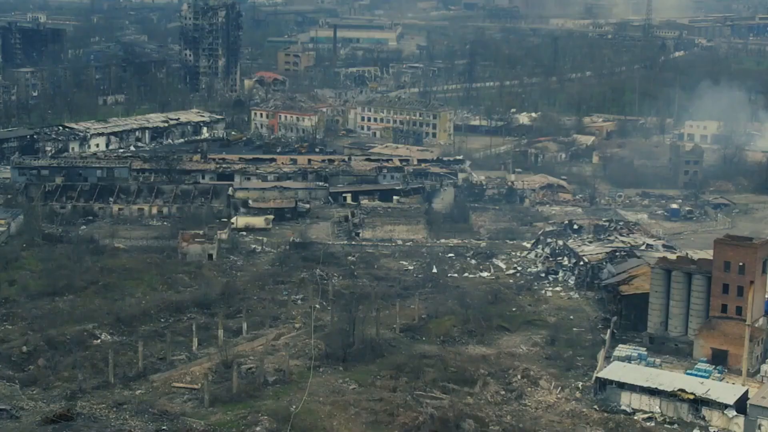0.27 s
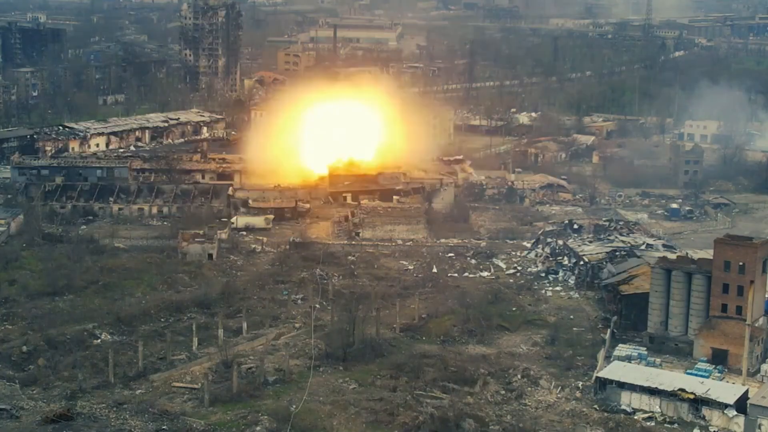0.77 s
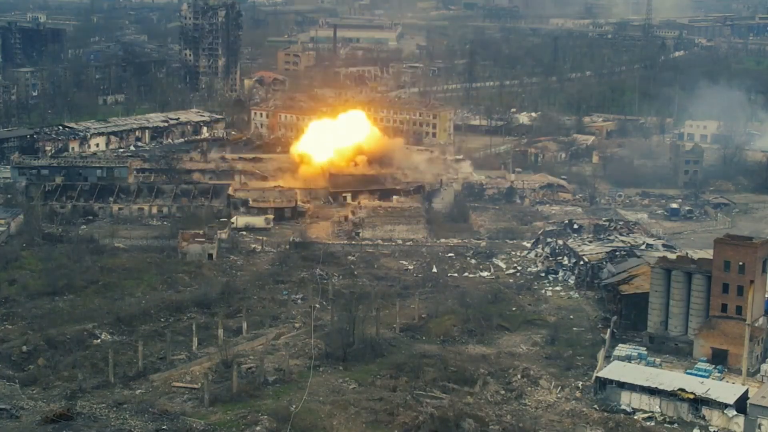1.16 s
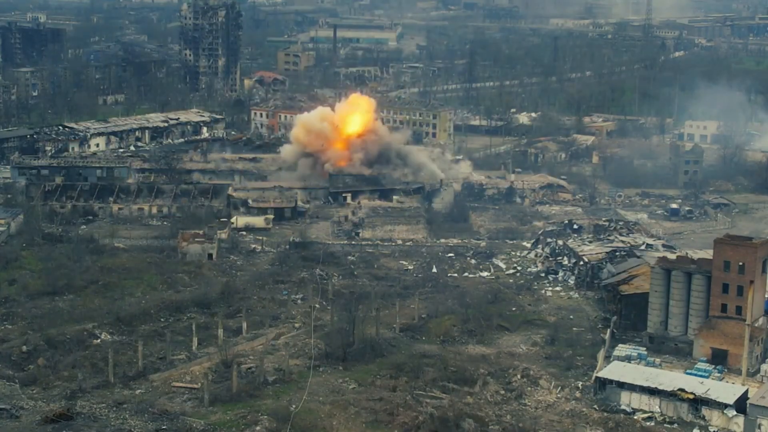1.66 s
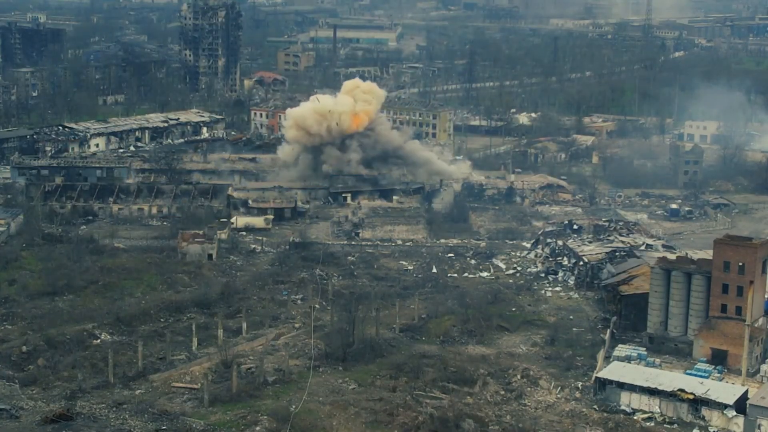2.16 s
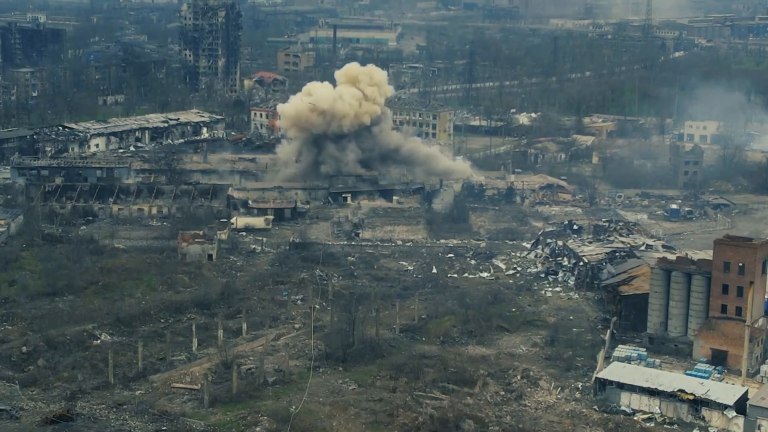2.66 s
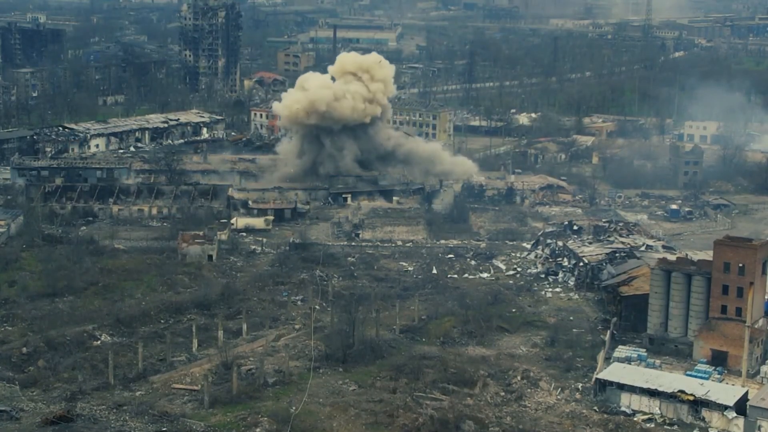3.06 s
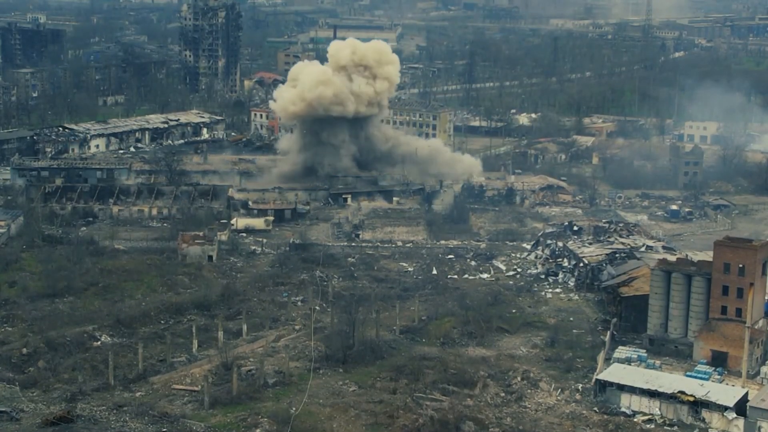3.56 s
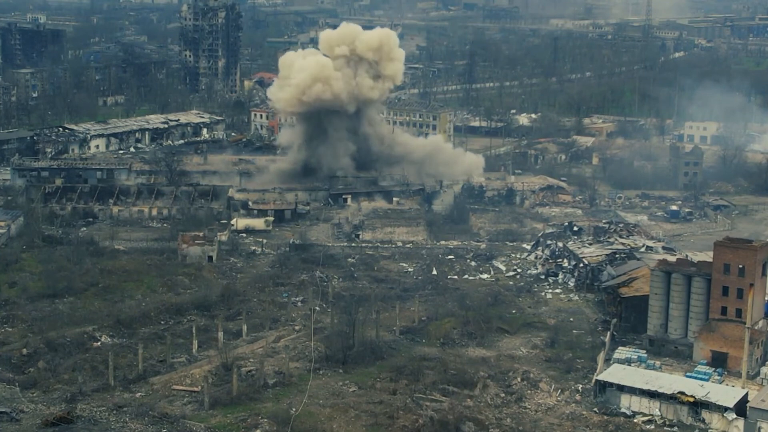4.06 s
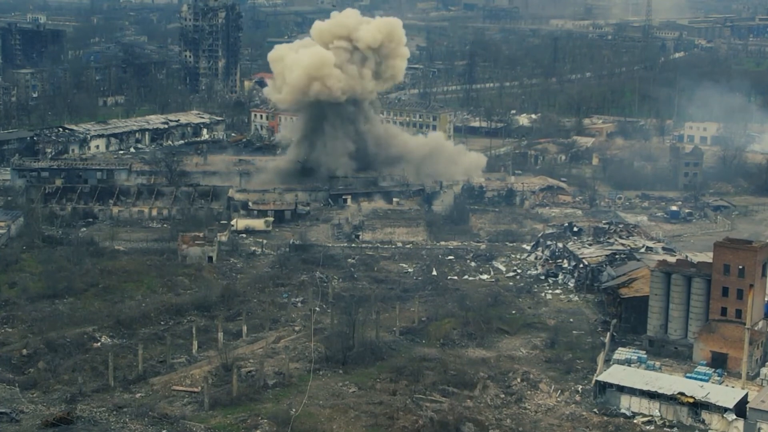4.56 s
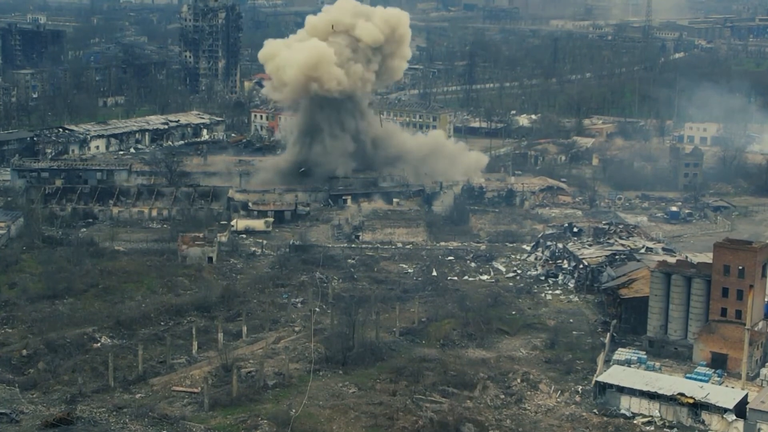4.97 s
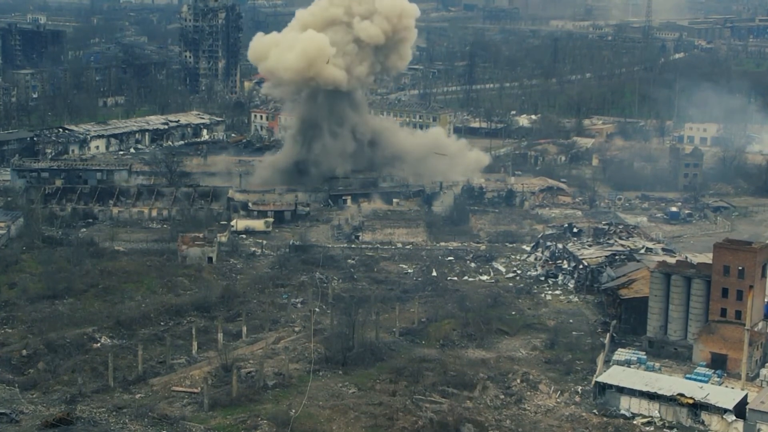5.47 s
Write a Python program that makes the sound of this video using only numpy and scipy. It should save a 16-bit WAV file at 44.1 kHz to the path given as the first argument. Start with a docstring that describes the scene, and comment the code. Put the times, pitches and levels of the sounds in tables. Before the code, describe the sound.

Outdoors over wide ruins, a low wavering hum with brief dropouts sits in rushing air for under a second. A huge blast cuts it off, flattening the microphone's peaks: dense cracks, booms and crackling roar. Further sharp shocks follow, the roar dulls and swells again, fragments tick and snap, far echoes thud, and the hum returns in short snatches over a deep rumble.

```python
"""Explosion among ruins

A wavering hum and rushing air, then a large blast outdoors that overloads the microphone and stops the hum.
Hum is beating tones, air and roar are coloured noise; the roar swells in waves, dulls and turns to deep rumble.
Shocks are single-cycle cracks with falling booms, debris is clusters of brief high modes with puffs of grit.
Lumps of echo and soft thuds roll in from afar, and the hum comes back in short stretches."""
import sys
import numpy as np
from scipy import signal
from scipy.fft import rfft, irfft
from scipy.io import wavfile
from scipy.ndimage import uniform_filter1d

SR = 44100
rng = np.random.default_rng(int(sys.argv[2]) if len(sys.argv) > 2 else 0)


def store_wav(level_fs):
    """Save 16-bit WAV to argv[1]."""
    pcm = np.round(np.clip(np.atleast_2d(level_fs), -1, 1) * 32767)
    wavfile.write(sys.argv[1], SR, pcm.T.astype(np.int16))


N = 252252
T = np.arange(N) / SR  # s

# Colours of noise. Each row: frequency in Hz, relative density in dB per Hz.
AIR_COLOUR = [(18, -1.5), (40, 0.5), (65, -7), (100, -2), (170, -2), (240, -7.5), (450, -7), (900, -11.5),
              (1800, -23), (3500, -45), (8000, -50.5), (15000, -65.5)]
ROAR_COLOUR = [(15, -14), (35, 0.5), (70, -3.5), (150, -1.5), (280, -8), (450, -11.5), (1000, -17.5),
               (2300, -31), (4000, -49), (7300, -52.5), (9000, -64), (15000, -78.5)]
RUMBLE_COLOUR = [(15, -0.5), (70, 6.5), (160, -1), (240, -6.5), (330, -11), (550, -18), (1000, -31.5),
                 (2000, -37.5), (3200, -51.5), (4500, -46.5), (7300, -63.5), (9800, -61), (15000, -83)]
SCATTER_COLOUR = [(30, 8), (150, 9.5), (400, -1.5), (900, -7.5), (2500, -24), (4500, -32.5), (8000, -41),
                  (15000, -68.5)]
GRIT_COLOUR = [(1500, -34.5), (3500, -2.5), (5200, -6), (7400, -3), (9000, -16), (12000, -25.5),
               (16000, -31.5)]
THUD_COLOUR = [(25, -7.5), (60, 4), (200, 0), (450, -4.5), (800, -12.5), (1600, -28), (4000, -50),
               (12000, -76)]
# Likeness of left and right in the open. Each row: frequency in Hz, correlation from -1 to 1.
LIKENESS = [(60, 1), (180, 0.95), (330, 0.9), (520, 0.6), (950, -0.21), (1700, 0.16), (3500, 0.35),
            (6000, -0.097)]
# Balance of the wide roar. Each row: frequency in Hz, left minus right in dB.
LEAN = [(50, -3.5), (200, -3.5), (330, -6), (520, -6), (750, -5), (1150, -1.5), (2600, -0.4), (7000, -4)]

# Faint rings above the hum. Each row: pitch in Hz, width in Hz, relative level in dB.
HUM_RINGS = [(418, 35, -15), (705, 20, -24), (812, 27, -31), (1015, 20, -26.5), (1092, 18, -35.5),
             (1300, 43, -33.5)]
# Brief dips of the hum. Each row: centre in seconds, depth in dB, half length in seconds.
HUM_DIPS = [(0.025, 18.5, 0.0099), (0.061, 14, 0.012), (0.187, 14.5, 0.038), (0.285, 10, 0.009),
            (0.393, 22, 0.0047), (0.426, 6, 0.012), (0.475, 25, 0.007), (0.591, 21, 0.007),
            (0.639, 12, 0.02)]
# Stretches of returning hum. Each row: start in seconds, length in seconds, relative level in dB, pitch in Hz.
HUM_RETURNS = [(3.443, 0.046, -12, 274.8), (3.717, 0.048, -17, 274), (4.123, 0.04, -13.5, 278.7),
               (4.24, 0.073, -14, 271.4), (4.466, 0.098, -13, 271.7), (4.661, 0.1, -12, 272.5),
               (4.839, 0.061, -13, 269.8), (4.887, 0.11, -12.5, 270.4), (5.068, 0.063, -13, 282.8),
               (5.121, 0.06, -12.5, 289.8), (5.284, 0.104, -10.5, 271.8), (5.469, 0.142, -10.5, 274.3)]

# Gusts in the rushing air. Each row: peak in seconds, relative level in dB, rise in seconds, fall in seconds.
GUSTS = [(.12, -44, 0.027, 0.024), (.325, -31, 0.019, 0.014), (.468, -24.5, 0.018, 0.029),
         (.7, -33.5, .015, 0.015)]

# Dull far echoes. Each row: start in seconds, relative level in dB.
THUDS = [(2.7, -10.5), (4.1, -20.5), (4.625, -15), (5.642, -7.5)]
# Lumps of echo. Each row: peak in seconds, level in dB, half length in seconds, centre in Hz.
ROLLS = [(0.798, -10, 0.013, 624), (.803, -5.5, 0.011, 151), (1.0, -14.5, .025, 410),
         (1.102, -13.5, 0.05, 179), (1.13, -25, 0.053, 1100), (1.215, -12, 0.054, 165),
         (1.25, -16.5, 0.018, 277), (1.344, -25, 0.047, 500), (1.35, -10, 0.06, 59.7),
         (1.562, -10.5, 0.027, 65), (1.662, -11.5, 0.023, 312), (2.144, -17, 0.051, 383),
         (2.188, -14.5, 0.021, 290), (2.297, -19, 0.039, 80.5), (2.337, -26, 0.027, 410),
         (2.56, -10.5, 0.0074, 194), (2.712, -12.5, 0.024, 141), (2.953, -10, 0.038, 167),
         (3.098, -14, 0.0065, 168), (3.106, -21, 0.021, 700), (3.464, -23.5, 0.033, 800),
         (3.513, -24.5, 0.066, 286), (3.71, -14, 0.027, 153), (4.08, -17.5, 0.029, 150),
         (4.147, -10, 0.025, 55), (4.287, -20, .07, 390), (4.55, -36, 0.063, 2100),
         (4.597, -20, 0.049, 520), (4.664, -13, 0.05, 85), (5.357, -12, 0.011, 511.7),
         (5.385, -13, 0.025, 150), (5.6, -38, 0.11, 1120), (5.648, -20, 0.013, 450),
         (5.67, -14.5, 0.044, 110)]
# Swells of the roar, from the fireball to its far echoes.
# Each row: peak in seconds, level in dB, rise in seconds, fall in seconds.
ROAR_SWELLS = [(1.03, -15, 0.05, 0.1), (1.22, -16, 0.046, 0.07), (1.76, -24.5, 0.21, 0.18),
               (3.8, -21.5, 0.48, 0.43), (4.42, -19.5, 0.33, 0.29)]
# Crackle in the fireball and its echoes.
# Each row: peak in seconds, relative level in dB, rise in seconds, fall in seconds.
CRACKLE = [(1.05, -30, 0.097, 0.082), (1.26, -29.5, 0.13, 0.11), (1.78, -35.5, 0.23, 0.3),
           (4.42, -36, 0.14, 0.26)]

# Separate ticks of falling fragments, faint to loud. Each row: landing in seconds, relative level in dB,
# decay in seconds, left minus right in dB.
DEBRIS = [(0.9658, -8.5, 0.0014, 0), (1.714, -11.5, 0.0011, -9), (2.0106, -14, 0.0013, -8.5),
          (2.144, -20, 0.0013, -11), (2.628, -25.5, 0.0037, -4), (2.77, -24, 0.0019, -16),
          (2.9663, -28, 0.002, -7), (3.12, -28, 0.0018, -11), (3.1975, -19.5, 0.0026, -5),
          (3.23, -27, 0.0018, -4), (3.5328, -26.5, 0.0035, 0), (3.602, -19.5, 0.0039, -5),
          (3.641, -29, 0.0018, -5), (3.672, -16.5, 0.0035, 2), (3.702, -22, 0.0016, 1),
          (3.7483, -36, .002, -7), (3.7748, -30, .003, -6), (3.8297, -14.5, 0.0026, -11),
          (3.843, -22, 0.0022, -11), (3.888, -31, .003, -5), (3.926, -18, 0.0014, -14),
          (3.9943, -29, .002, -5), (4.0338, -23, .002, -8), (4.052, -11.5, 0.0029, -9),
          (4.072, -32, .002, -5), (4.113, -26.5, 0.0016, 8), (4.207, -27, .002, -8),
          (4.269, -19.5, 0.0017, -7), (4.3444, -13, 0.002, 1), (4.418, -23, 0.0024, 6),
          (4.4707, -33, 0.0015, 0), (4.485, -21, 0.0021, 1), (4.486, -16, 0.008, 3),
          (4.7381, -31, 0.0022, -3), (4.7734, -29, 0.0016, 0), (4.799, -23, .0015, 7)]
# Sprays of fine grit. Each row: peak in seconds, relative level in dB, rise in seconds, fall in seconds.
SPRAYS = [(.83, -41.5, 0.034, 0.2), (1.1, -47.5, .1, .2), (1.53, -44, 0.026, 0.056),
          (1.662, -44.5, 0.014, 0.028), (1.78, -48.5, .03, 0.09), (3.07, -47, 0.021, 0.026),
          (3.55, -61, 0.048, 0.064), (4.15, -70, 0.21, 0.4)]
# Sharp snaps. Each row: start in seconds, relative level in dB, left minus right in dB.
SNAPS = [(.768, -16.5, -4), (0.774, -25, 5), (0.785, -24, 0), (3.2515, -9, -14), (4.4912, -22, -4)]
# Ringing of a snap. Each row: mode in Hz, relative level in dB, time to fall 60 dB in seconds.
SNAP_MODES = [(2680, -8, 0.0085), (3450, -15, 0.003), (3800, 8.5, 0.00096), (5800, 0, 0.0018),
              (7350, -11, 0.0089), (9900, -21.5, 0.0044), (13500, -27, 0.0044)]

# Shock fronts. Each row: arrival in seconds, relative crack level in dB, relative boom level in dB,
# last pitch of the boom in Hz, boom decay in seconds, left minus right in dB.
SHOCKS = [(0.809, 2, 0, 214, 0.0064, 13), (0.8147, 0.5, 9, 53.8, 0.013, -3.5),
          (0.8427, 0.5, -4, 86, .012, -2), (0.8990, 1, 3.5, 171.5, 0.014, -7.5),
          (0.9654, 0, -4.5, 106, .02, -6), (1.003, -4, -15, 120, .015, 6), (1.044, -5, 1, 172, .012, -2),
          (1.098, -0.5, 1.5, 150, 0.011, -4), (1.1203, -0.5, -7, 153, .01, 3),
          (1.5027, 3, 16.5, 65, 0.0022, 1), (1.6063, 1, -4, 132, 0.0063, -2),
          (1.7135, 2.5, 5, 125, .014, -5.5), (1.7553, 1, -6, 146, 0.013, -4),
          (1.7704, 1, -14, 160, 0.013, -1), (1.803, 0, -24, 150, 0.0053, -1),
          (1.8443, 0, -7, 141, 0.0089, -7), (1.885, -1, -8, 154, .014, -5), (2.0118, 0, 5, 80, 0.014, -4.5),
          (2.144, -1, -1.5, 90.6, 0.026, -3), (2.1844, -1.5, -4, 112, 0.013, -13),
          (2.326, -1.5, -2, 109, 0.0094, -2), (2.387, -8, -5, 130, 0.0086, -5),
          (2.635, -3, -8, 84, 0.012, -2), (2.868, -8, -9, 149, 0.016, 0),
          (3.1326, -2.5, 3, 199, 0.0033, -7), (3.4472, -1.5, -2, 94.5, 0.011, -6),
          (3.627, -3.5, 2, 131, 0.006, -4), (4.614, -2.5, -2.5, 85, .02, -6.5),
          (5.346, -6, 0.5, 150, 0.029, 2.5)]
# The blast itself, a dense volley of fronts.
# Each row: peak in seconds, level in dB, rise in seconds, fall in seconds.
VOLLEY = [(.805, -4.5, 0.024, 0.013), (.843, -8.5, 0.01, 0.014)]
# The deep whump under the volley. Each row: peak in seconds, level in dB, rise in seconds, fall in seconds.
WHUMP = [(.832, -19, 0.015, 0.033)]

# the blast cuts off the air and brings in the roar; later the roar settles into the rumble
BLAST_S, SETTLE_S = .795, 4.75
# the hum before the blast: centre pitch, level outside the dips, spread of its wandering, end
HUM_HZ, HUM_DB, HUM_WANDER_HZ, HUM_STOP_S = 276.3, -5, 4.21, .787
HUM_BLUR, HUM_PARTNER_DB = .2, -10
RING_DRIFT = .006  # the rings drift together by this share of their pitch
RETURN_DB, RETURN_WANDER_HZ = -0.5, 5.73  # added to the level of each returning stretch; spread of its pitch
THUD_ATTACK_S, THUD_DECAY_S = 0.0013, 0.027
ROLL_SPAN = 1.35  # each lump reaches this factor below and above its centre
# between swells the roar sinks to a bed; bass and treble follow its middle
ROAR_BED_DB, BASS_BED_DB, BASS_FOLLOW, TREBLE_UNDER_DB = -23, -14.5, 1, 20.5
# the treble starts out brighter and dulls as the paths grow longer
FRESH_TREBLE_DB, DULLING_S = 12, 0.54
SURGE_DB, SURGE_PER_S = 0.3, 4.4  # the bass of the roar surges at random
# the last rumble keeps its bass and middle under a growing hiss
RUMBLE_BASS_DB, RUMBLE_MIDDLE_DB, HISS_DB, HISS_DB_PER_S = -8, -21.5, -49.5, 10
# a longer-ringing fragment is larger and lower; the pitch is that of a shower fragment
CHIP_HZ, CHIP_SCATTER, CHIP_SIZE_POWER, CHIP_TOP_HZ = 6260, 0.063, 0.24, 13000
PUFF_DB, PUFF_S = -33, 0.013  # grit thrown up by a landing, against the fragment's level, and its decay
SPLINTER_DB, SPLINTER_S = -17, 0.012  # splinters skipping after a landing, and how fast they die out
# small fragments come down in one shower
SHOWER_S, SHOWER_SPREAD_S, SHOWER_DB, SHOWER_DECAY_S = 4.02, 0.38, -31, 0.002
# after a shock arrives: the middle of its crack, then the rise and decay of its scatter
CRACK_LAG_S, SCATTER_RISE_S, SCATTER_S = .0008, .001, 0.0051
# a weak front has lost its edge: half length of the crack, its edge at 0 dB, blunting as it weakens
CRACK_S, EDGE_S, BLUNTING_PER_DB = 0.00043, 0.00011, 0.37
# a boom starts this far above its last pitch and falls at once
BOOM_FALL_HZ, BOOM_FALL_S, BOOM_RISE_S = 713, 0.00182, 0.0017
TOP_HZ = 15800  # the highest frequency kept at the end


def undb(db):
    """Decibels to gain."""
    return 10 ** (np.asarray(db) / 20)


def rise(at, length):
    """A smooth step from 0 to 1."""
    return .5 + .5 * np.tanh((T - at) / length)


def pan(db):
    """Left and right gains for a balance of left minus right in dB."""
    return undb(np.array([[db], [-db]]) / 2)


def by_frequency(points):
    """Points joined on a log-frequency axis, one value a bin."""
    hz, value = np.transpose(points)
    bins = np.fft.rfftfreq(N, 1 / SR) + 1
    return np.interp(np.log(bins), np.log(hz), value)


def band(x, lo_hz, hi_hz):
    """The part of a sound between two frequencies, with soft edges."""
    f = np.fft.rfftfreq(N, 1 / SR) + 1
    return irfft(rfft(x) / (1 + (lo_hz / f) ** 8) / (1 + (f / hi_hz) ** 8), N)


def rms(x):
    """Level of the centre of a sound."""
    return np.sqrt(np.mean(np.atleast_2d(x).mean(axis=0) ** 2))


def noise(colour, likeness, lean_db=0):
    """Coloured stereo noise with a given correlation and balance between the sides."""
    c = np.clip(likeness, -.999, .999)
    sides = np.array([[1], [-1]])
    mid, side = rfft(rng.standard_normal((2, N))) * undb(by_frequency(colour))
    both = mid * np.sqrt(1 + c) + side * np.sqrt(1 - c) * sides
    x = irfft(both * undb(sides * lean_db / 2), N)
    return x / rms(x)


def walk(rate):
    """Smooth chance with a spread of 1, changing up to about rate times a second."""
    re, im = rng.standard_normal(size=(2, 600))
    f = np.arange(len(re)) * SR / N
    x = irfft((re + 1j * im) * np.minimum(f, 1) / (1 + (f / rate) ** 8), N)
    return x / x.std()


def knocks(rate, decay, spread_db):
    """Random arrivals of uneven size, rate a second, each dying away."""
    size = undb(spread_db * np.minimum(rng.exponential(size=N), 3))
    hits = (rng.random(N) < rate / SR) * size
    return signal.lfilter([1], [1, -np.exp(-1 / (decay * SR))], hits)


def swells(table):
    """Smooth swells, each with its own rise and fall, adding in power."""
    power = 0
    for at, db, up, down in table:
        power = power + undb(db) ** 2 * np.exp(-((T - at) / np.where(T < at, up, down)) ** 2)
    return np.sqrt(power)


def add(out, at, sound):
    """Lay a short sound in at its time."""
    i = int(at * SR)
    out[:, i:i + sound.shape[-1]] += sound[:, :N - i]


def tone(db, hz, blur, partner_db):
    """A blurred low tone that beats against a weaker partner a little higher up."""
    waver = 1 + blur * (walk(9.7) + 1j * walk(25.0))
    partner = undb(partner_db) * np.exp(2j * np.pi * np.cumsum(18 + 8 * walk(12.1)) / SR)
    carrier = np.exp(2j * np.pi * np.cumsum(hz * np.ones(N)) / SR)
    x = np.real((waver + partner) * carrier)
    return x / rms(x) * undb(db)


def hum_rings():
    """Faint stereo rings blurred by chance, all drifting together."""
    rings, drift = 0, 1 + RING_DRIFT * walk(6)
    for hz, width, db in HUM_RINGS:
        blur = np.array([walk(width / 2) + 1j * walk(width / 2) for _ in range(2)])
        rings = rings + undb(db) * np.real(blur * np.exp(2j * np.pi * np.cumsum(hz * drift) / SR))
    return rings


def hum():
    """A beating tone wanders and dips, stops at the blast and comes back in short, wavering stretches."""
    rings = hum_rings()
    dips_db = sum(depth * np.exp(-((T - at) / length) ** 2) for at, depth, length in HUM_DIPS)
    pitch = HUM_HZ + HUM_WANDER_HZ * walk(9.1)
    steady = tone(HUM_DB - dips_db, pitch, blur=HUM_BLUR, partner_db=HUM_PARTNER_DB)
    before = (steady + undb(-8.0) * rings) * pan(-8.0)

    start, length, db, hz = np.transpose(HUM_RETURNS)
    middle = start + length / 2
    pitch = np.interp(T, middle, hz) + RETURN_WANDER_HZ * walk(14.7)
    stretches = swells(zip(middle, db, length / 2, length / 2))
    after = tone(RETURN_DB, pitch, blur=0.34, partner_db=-10) * stretches * pan(-0.64)
    return before * (1 - rise(HUM_STOP_S, 0.01)) + after


def air():
    """Noise rushes steadily until the blast; gusts sound in its upper middle and lift its hiss."""
    gust = swells(GUSTS)
    x = noise(AIR_COLOUR, by_frequency(LIKENESS) - .15)
    parts = band(x, 0.73, 340), band(x, 300, 1300), band(x, 1200, 3900), band(x, 3000, 20000)
    low, middle, gusty, hiss = (p / rms(p) for p in parts)
    rush = (low * undb(-13.0) * pan(-4.0)
            + middle * undb(-24.0) * pan(-4.0)
            + gusty * np.hypot(undb(-37), gust) * pan(-3.5)
            + hiss * np.hypot(undb(-53.0), undb(-21.5) * gust) * pan(-6.0))
    return rush * (1 - rise(BLAST_S, 0.0074))


def thuds():
    """Far echoes have lost their crack and arrive as soft, centred thuds of dull noise."""
    level = 0
    for at, db in THUDS:
        t = np.maximum(T - at, 0)
        level = level + undb(db) * (1 - np.exp(-t / THUD_ATTACK_S)) * np.exp(-t / THUD_DECAY_S)
    return noise(THUD_COLOUR, likeness=1.0) * level


def rolls():
    """Groups of ruins each send back a lump of echo, brighter or darker with the path."""
    out = 0
    for at, db, length, hz in ROLLS:
        x = noise(ROAR_COLOUR, by_frequency(LIKENESS), lean_db=-2.0)
        x = band(x, hz / ROLL_SPAN, hz * ROLL_SPAN)
        out = out + x / rms(x) * swells([(at, db, length, length)])
    return out


def rolling(levels_db, colour, likeness, lean_db, lumpy):
    """Countless overlapping echoes arrive in lumps; bass, middle and treble each have their level."""
    lumps = knocks(rate=60, decay=0.017, spread_db=4.0)
    lumps = uniform_filter1d(lumps, size=150)  # distance rounds their edges
    x = noise(colour, likeness, lean_db) * (1 + lumpy * lumps / rms(lumps))
    parts = band(x, 0.86, 297.5), band(x, 304, 1710), band(x, 1756, 20000)
    return sum(p / rms(p) * undb(db) for p, db in zip(parts, levels_db))


def roar():
    """Wide noise swells and dulls, then gives way to a deep rumble from almost straight ahead."""
    middle_db = 20 * np.log10(np.hypot(undb(ROAR_BED_DB), swells(ROAR_SWELLS)))
    bass_db = BASS_BED_DB + BASS_FOLLOW * (middle_db - ROAR_BED_DB) + SURGE_DB * walk(SURGE_PER_S)
    fresh = np.exp(-np.maximum(T - BLAST_S, 0) / DULLING_S)
    treble_db = middle_db - TREBLE_UNDER_DB + FRESH_TREBLE_DB * fresh
    wide = rolling((bass_db, middle_db, treble_db), ROAR_COLOUR, by_frequency(LIKENESS),
                   by_frequency(LEAN), lumpy=0.38)

    hiss_db = HISS_DB + HISS_DB_PER_S * (T - SETTLE_S)
    deep = rolling((RUMBLE_BASS_DB, RUMBLE_MIDDLE_DB, hiss_db), RUMBLE_COLOUR,
                   likeness=1, lean_db=-0.5, lumpy=0.28)
    settled = rise(SETTLE_S, 0.26)
    return wide * rise(BLAST_S, 0.0116) * np.sqrt(1 - settled) + deep * np.sqrt(settled)


def crackle():
    """Countless tiny fronts crackle in the roar of the fireball and its echoes."""
    left, right, centre = (band(knocks(rate=230, decay=0.00044, spread_db=-2.5), 350, 4450)
                           for _ in range(3))
    x = np.array([left, right]) + centre
    return x / rms(x) * swells(CRACKLE) * pan(-3.5)


def chip(hz, decay, spread):
    """A fragment lands: a cluster of brief high modes, heard differently on each side."""
    t = T[:SR // 30]
    detune = rng.standard_normal(size=(30, 1))
    modes = np.minimum(hz * np.exp(spread * detune), .45 * SR)
    phases = 2 * np.pi * rng.random(size=(2, len(modes), 1))
    x = (np.exp(-detune ** 2 / 2) * np.sin(2 * np.pi * modes * t + phases)).sum(axis=1)
    x = x * np.exp(-t / decay) * (1 - np.exp(-t / 0.00015))
    return x / np.abs(x).max()


def bounces(count):
    """Impulses for a landing and the splinters that skip after it, smaller on the whole as time goes on."""
    when, size = rng.random(size=(2, count))
    train = np.zeros(SR // 30)
    gain = undb(SPLINTER_DB) * size * np.exp(-when * T[len(train)] / SPLINTER_S)
    np.add.at(train, (when * len(train)).astype(int), gain)
    train[0] = 1
    return train


def shower(count):
    """Small fragments at random, in rows like those of the table of fragment ticks."""
    when, size, side = rng.standard_normal(size=(count, 3)).T
    landing = np.clip(SHOWER_S + SHOWER_SPREAD_S * when, BLAST_S, SETTLE_S)
    return list(zip(landing, SHOWER_DB + 2 * size, np.full(count, SHOWER_DECAY_S), -5 + 6 * side))


def snap_ring():
    """A sharp snap: a few high modes, each dying at its own rate."""
    t = T[:SR // 30]
    return sum(undb(db) * np.sin(2 * np.pi * hz * t) * np.exp(-np.log(1000) * t / t60)
               for hz, db, t60 in SNAP_MODES)


def debris():
    """Fragments tick on the ruins and throw up grit; sharp snaps open the blast and cut through its tail."""
    out, ring = np.zeros((2, N)), snap_ring()
    patter = np.array([knocks(rate=170, decay=0.0017, spread_db=3.3) for _ in range(2)])
    grit = noise(GRIT_COLOUR, 0) * patter
    grit = grit / rms(grit)
    after = T[:SR // 8]
    puff = np.exp(-after / PUFF_S) * (1 - np.exp(-after / 0.0014))
    for at, db, decay, lr_db in DEBRIS + shower(count=40):
        size_pitch = (SHOWER_DECAY_S / decay) ** CHIP_SIZE_POWER
        hz = CHIP_HZ * size_pitch * np.exp(CHIP_SCATTER * rng.standard_normal())
        tick = undb(-6.0) * chip(hz, decay, spread=0.3) + undb(-10.5) * ring
        tick = signal.fftconvolve(tick, bounces(count=7)[None], axes=1)
        add(out, at, undb(db) * tick * pan(lr_db))
        thrown = grit[:, int(at * SR):][:, :len(puff)]
        add(out, at, undb(db + PUFF_DB) * puff * thrown * pan(lr_db))
    out = band(out, 1500, CHIP_TOP_HZ)
    for at, db, lr_db in SNAPS:
        add(out, at, undb(db) * ring * pan(lr_db))
    return out + grit * swells(SPRAYS) * pan(-1.1)


def shocks():
    """Each shock is a one-cycle crack, a boom falling in pitch as the lows come late, and rubble scatter."""
    out, t = np.zeros((2, N)), T[:SR // 4]
    scatter = noise(SCATTER_COLOUR, by_frequency(LIKENESS))
    u = t - CRACK_LAG_S
    for at, crack_db, boom_db, hz, decay, lr_db in SHOCKS:
        pitch = hz + BOOM_FALL_HZ * np.exp(-t / BOOM_FALL_S)
        boom = np.sin(2 * np.pi * np.cumsum(pitch) / SR)
        boom = boom * np.exp(-t / decay) * (1 - np.exp(-t / BOOM_RISE_S))

        now = slice(int(at * SR), int(at * SR) + len(t))
        tail = scatter[:, now] * np.exp(-t / SCATTER_S) * (1 - np.exp(-(t / SCATTER_RISE_S) ** 2))

        edge = EDGE_S * np.exp(-BLUNTING_PER_DB * crack_db)
        cycle = -np.tanh(u / edge) * np.exp(-(u / CRACK_S) ** 2)
        cycle = cycle * np.tanh((2 * t / CRACK_LAG_S) ** 2)  # starts from silence

        crack = undb(crack_db) * (undb(-7.5) * cycle + undb(-3.5) * tail)
        add(out, at, (undb(boom_db) * boom + crack) * pan(lr_db))
    return out


def blast():
    """The first fronts arrive too thick to tell apart: a hard burst of scatter, its rebound and a deep whump."""
    scatter = noise(SCATTER_COLOUR, by_frequency(LIKENESS), lean_db=-7.0)
    whump = band(noise(THUD_COLOUR, likeness=0.76), 28, 97)
    return scatter * swells(VOLLEY) + whump / rms(whump) * swells(WHUMP)


def scene():
    """Hum and air, then the blast and all that follows it."""
    background = hum() + air()
    echoes = thuds() + rolls() + roar() + crackle()
    return background + echoes + debris() + shocks() + blast()


def record(dry):
    """The overloaded microphone flattens the loudest peaks, and a steep filter cuts the top."""
    knee = 14  # higher is harder
    clipped = dry / (1 + np.abs(dry) ** knee) ** (1 / knee)
    return signal.sosfilt(signal.ellip(8, .2, 70, TOP_HZ, fs=SR, output="sos"), clipped)


dry = scene()
out = record(dry)
store_wav(out)
```